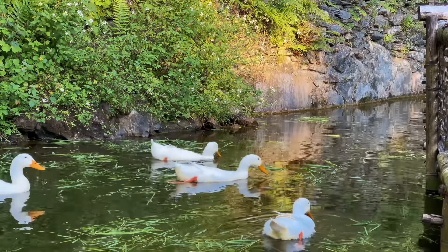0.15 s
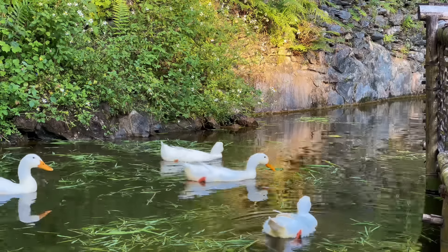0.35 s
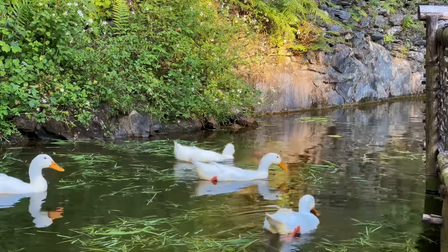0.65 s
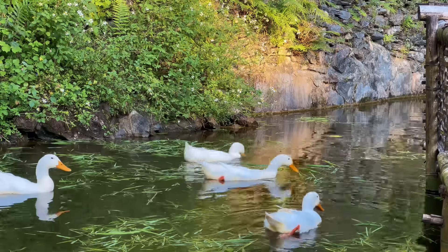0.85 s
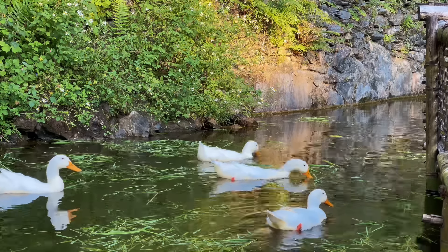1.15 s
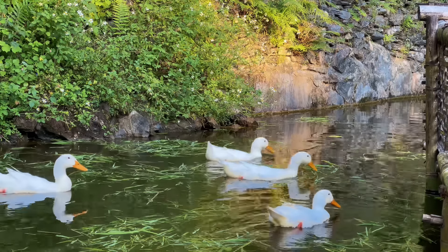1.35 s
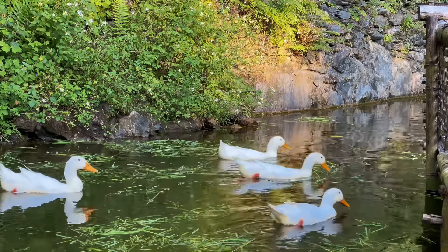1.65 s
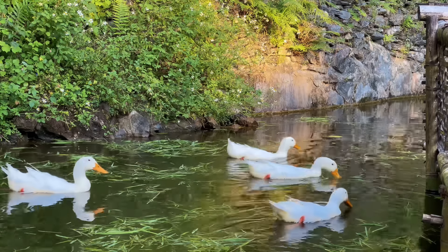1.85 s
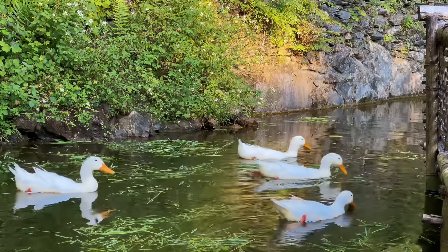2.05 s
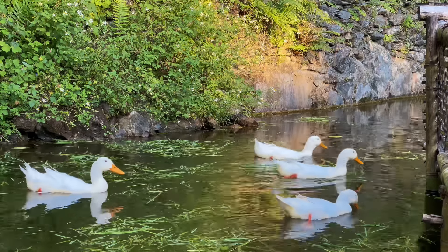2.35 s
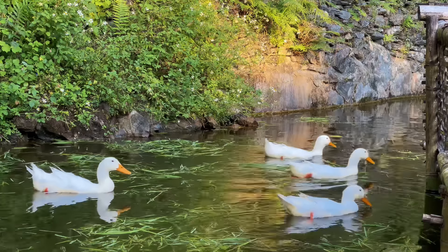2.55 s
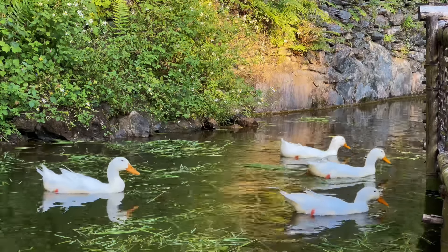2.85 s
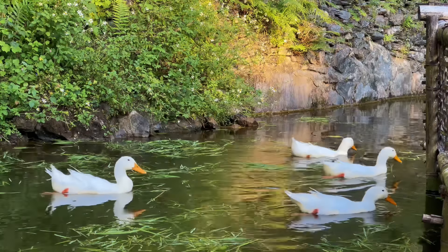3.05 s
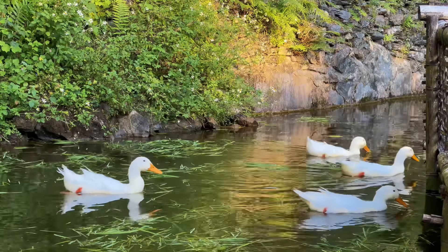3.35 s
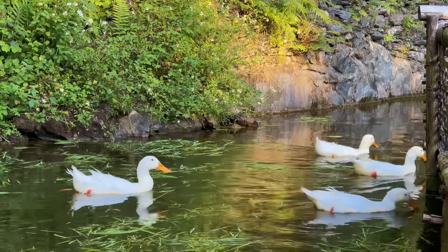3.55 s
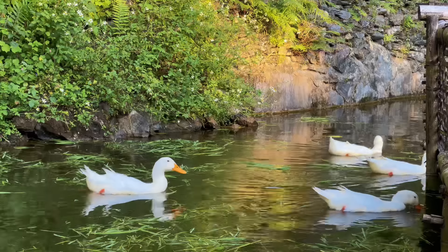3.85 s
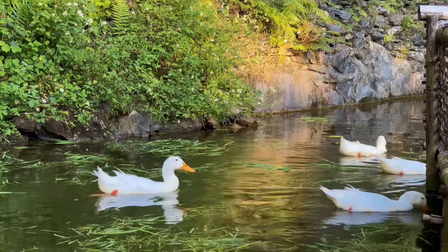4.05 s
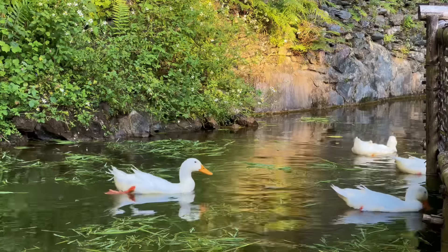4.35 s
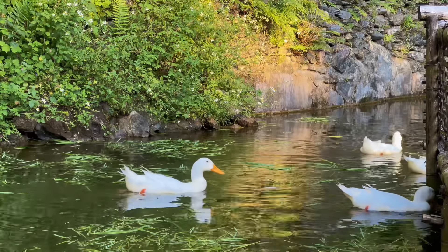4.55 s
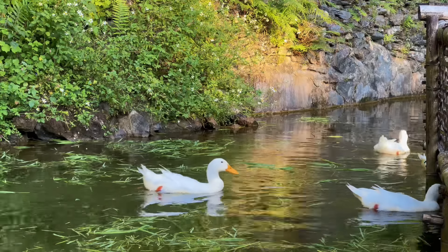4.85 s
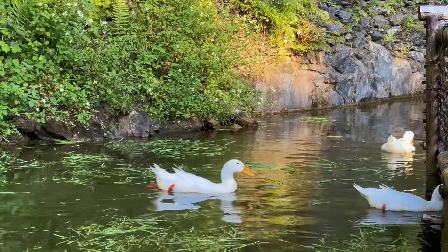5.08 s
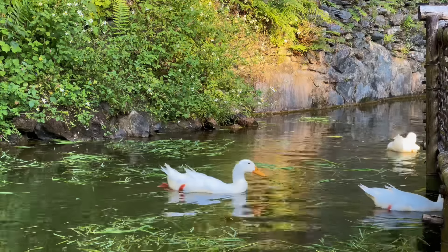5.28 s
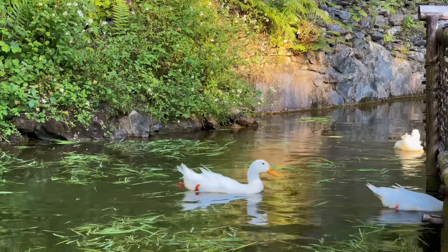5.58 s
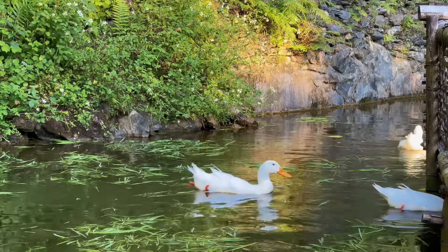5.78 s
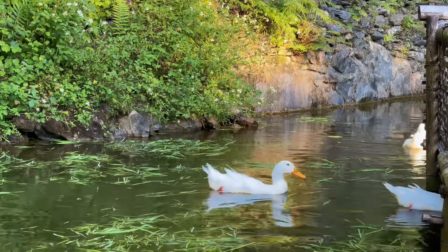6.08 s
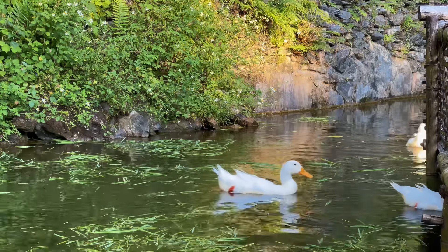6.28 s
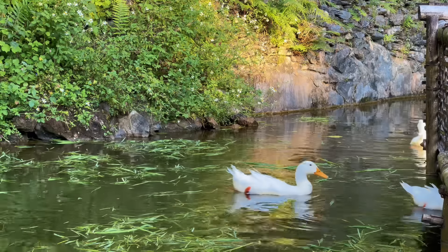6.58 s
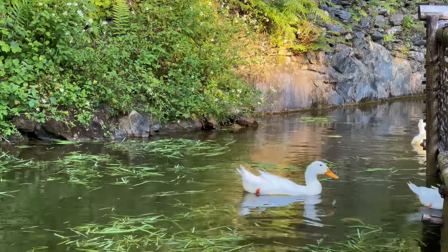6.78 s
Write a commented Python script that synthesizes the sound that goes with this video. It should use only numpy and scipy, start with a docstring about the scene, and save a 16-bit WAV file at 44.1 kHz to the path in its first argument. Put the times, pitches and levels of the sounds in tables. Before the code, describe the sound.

Water trickles steadily into a small pond for about seven seconds, heard in narrow stereo under a soft outdoor hush. In front, ducks paddle and dabble: their feet churn up bubbles and rounded plops, their bills make fine spray and small sloshes, and bright drops patter back with tiny snaps and clicks. The plops carry a slight, quick echo from the banks. Activity is busy from the start to about 1.8 seconds, again from 2.3 to 3.7 and from 4 to 5.3, with a brief lull around 5.5 and more dabbling from 6. A cricket fades in by 0.5 seconds with a high, rapid, even trill and stops suddenly at about 6.7, while fainter crickets continue farther off. Distant engines add a very faint low hum that swells slightly near the start, around 2.5 and between 4 and 5 seconds.

```python
"""A small pond under a rocky, overgrown bank, heard in narrow stereo.
In front, ducks paddle and dabble: their feet and bills trap bubbles that plop, and throw drops
that patter back, while water trickles in steadily. A cricket trills in the bushes, scraping its
wings, with others farther behind. Distant engines hum under a soft outdoor hush."""
import sys
import numpy as np
from scipy import signal
from scipy.fft import rfft, irfft
from scipy.io import wavfile

SR = 44100
rng = np.random.default_rng(int(sys.argv[2]) if len(sys.argv) > 2 else 0)


def inscribe(sig):
    """Save sig as 16-bit PCM at rate SR to the path in sys.argv[1].

    A 1-D sig is mono; a 2-D sig holds one channel per row.
    Samples are clipped to [-1, 1] before scaling.
    """
    pcm = np.round(np.clip(np.atleast_2d(sig).T, -1, 1) * 32767)
    wavfile.write(sys.argv[1], SR, pcm.astype(np.int16))


N = 305245
TIME = np.arange(N) / SR
FREQS = np.maximum(np.arange(N // 2 + 1) * SR / N, 1)
BUBBLE_RISE = 0.12  # share by which a bubble's pitch climbs while it rings

# water lapping between the ducks' pushes, with a lull late on: (time [s], level [dB])
LAPPING_LEVEL = [(0, -63), (.63, -68), (1.1, -67), (1.42, -70), (3.45, -67), (3.7, -69), (4.3, -63.5),
                 (5.35, -66.5), (5.52, -74.5), (6.2, -64), (6.75, -72)]


def paddling(push_s=0.0042, settle_s=0.093):
    """Each push of the feet churns up a swarm of bubbles; a deep kick stirs up bigger ones."""
    # pushes of the feet: (time [s], length [s], shallow churn [dB], deep churn [dB])
    pushes = [(0.0, 0.17, -58, -65.5), (0.212, 0.24, -55.5, -61.5), (1.006, 0.26, -61.5, -80),
              (1.916, 0.063, -60, -87), (2.257, 0.32, -66.5, -81), (2.59, 0.35, -56, -70),
              (2.823, 0.37, -59.5, -60), (3.249, 0.25, -64, -62.5), (3.967, 0.15, -54.5, -67),
              (4.433, 0.16, -63.5, -77), (4.679, 0.037, -53.5, -80), (4.99, 0.082, -62, -75),
              (5.267, 0.068, -62, -90), (5.998, 0.1, -66, -70), (6.444, 0.024, -62, -68.5)]
    # bubbles near the surface: (frequency [Hz], level [dB])
    shallow_spectrum = [(220, -21), (320, -6.5), (440, -3), (600, 1.5), (750, -2), (1050, 0.5),
                        (1250, -13.5), (1500, -0.5)]
    # bubbles from deeper down: (frequency [Hz], level [dB])
    deep_spectrum = [(200, -8), (300, -15), (370, 7.5), (500, -5)]
    shallow_power, deep_power = from_db(in_time(LAPPING_LEVEL)[0]) ** 2, np.zeros(N)
    for s, length, shallow_db, deep_db in pushes:
        push = stirring(s, length, push_s, settle_s)
        shallow_power += (from_db(shallow_db) * push) ** 2
        deep_power += (from_db(deep_db) * push) ** 2
    shallow = bubble_swarm(shallow_spectrum, per_s=380, cycles=37, spread_db=0.5, clump_db=3, count=8000)
    deep = bubble_swarm(deep_spectrum, per_s=260, cycles=12, spread_db=-0.2, clump_db=3, count=4000)
    return np.sqrt(shallow_power) * shallow + np.sqrt(deep_power) * deep


def dabbling(dip_s=0.017, drain_s=0.086, stray_db=-69):
    """Bills dip, sift the floating grass and drain: bouts of fine spray, stray droplets between."""
    # bouts of dabbling: (time [s], length [s], level [dB])
    bouts = [(0.07, 0.16, -55), (0.636, 0.13, -58.5), (1.004, 0.11, -67), (1.244, 0.077, -54.5),
             (2.257, 0.99, -59), (3.55, 0.13, -55), (3.952, 0.18, -59.5), (4.325, 0.53, -56),
             (5.204, .09, -55.5), (5.922, 0.53, -59.5), (6.821, 0.14, -54.5)]
    # fine bubbles at the bill: (frequency [Hz], level [dB])
    spectrum = [(1900, 7.5), (2300, 0), (2850, -0.5), (3300, -15.5), (4300, -1), (5500, -17), (9000, -2)]
    power = sum((from_db(db) * stirring(s, length, dip_s, drain_s)) ** 2 for s, length, db in bouts)
    level = np.sqrt(power + from_db(stray_db) ** 2) * from_db(2.6 * drift(18))
    spray = bubble_swarm(spectrum, per_s=330, cycles=19.5, spread_db=1.5, clump_db=3, count=12000)
    return treble_only(level * spray)


def sloshing(build_s=0.0059, calm_s=0.016):
    """A bill swishes sideways through the water and stirs up a lower slosh of bubbles."""
    # swishes: (time [s], length [s], level [dB])
    swishes = [(1.083, 0.046, -60), (1.268, 0.043, -53.5), (1.497, 0.028, -58), (1.804, 0.038, -54),
               (2.469, 0.023, -54), (4.006, 0.038, -58), (4.272, 0.027, -54), (4.414, 0.17, -59.5),
               (4.685, 0.025, -56)]
    # bubbles in a swish: (frequency [Hz], level [dB])
    spectrum = [(950, -2), (1250, -2.5), (1550, -2.5), (2000, 1)]
    level = sum(from_db(db) * stirring(s, length, build_s, calm_s) for s, length, db in swishes)
    return level * bubble_swarm(spectrum, per_s=350, cycles=22, spread_db=-6, clump_db=-0.5, count=5000)


def plops(gain_db=-0.3, echo_s=0.039, echo_db=-11.5, loss_db=8.5):
    """Feet and bills push big bubbles under; the two banks throw each note back and forth."""
    # large bubbles: (time [s], starting pitch [Hz], level [dB], time to fall 60 dB [s])
    big_bubbles = [(0.018, 836, -31, 0.022), (0.044, 640, -33.5, 0.03), (0.289, 526, -42.5, 0.24),
                   (0.333, 541, -49, 0.29), (0.443, 594, -33.5, 0.029), (0.712, 515, -35, 0.058),
                   (0.747, 505, -46.5, 0.2), (0.812, 500, -50.5, 0.16), (0.888, 500, -48, 0.11),
                   (1.057, 544, -45, 0.22), (1.143, 576, -42, 0.094), (1.237, 569, -44, 0.09),
                   (1.489, 850, -46.5, 0.17), (1.749, 448, -44.5, 0.1), (1.755, 591, -46.5, 0.17),
                   (2.029, 417, -44, 0.056), (2.259, 1020, -46.5, 0.088), (2.411, 697, -41.5, 0.042),
                   (2.608, 1093, -45, 0.089), (2.698, 580, -39, 0.11), (2.896, 486, -35, 0.018),
                   (3.308, 532, -41.5, 0.057), (3.512, 1100, -47.5, 0.097), (3.583, 1135, -44.5, 0.1),
                   (4.019, 950, -32, 0.024), (4.056, 480, -36.5, 0.063), (4.138, 905, -40.5, 0.1),
                   (4.405, 607, -37.5, 0.11), (4.457, 1020, -42, 0.065), (4.885, 1066, -27.5, 0.015),
                   (5.023, 608, -38.5, 0.11), (5.127, 591, -37.5, 0.13), (6.008, 550, -37.5, 0.049),
                   (6.238, 557, -42.5, 0.047), (6.876, 992, -48.5, 0.073)]
    out = np.zeros(N)
    for s, hz, db, t60 in big_bubbles:
        note = from_db(db + gain_db) * bubble(hz, t60, attack_s=0.0024)
        add(out, s, note)
        for bounce in range(3):
            arrival = s + (bounce + 1) * echo_s + rng.normal(0, 0.00223)
            add(out, arrival, from_db(echo_db - bounce * loss_db) * note)
    return out


def gurgles(rise=0.25, wobble_depth=0.13):
    """A pocket of air closes behind a foot: its note swells, wobbles and glides up as it shrinks."""
    # air pockets: (time [s], length [s], starting pitch [Hz], level [dB])
    pockets = [(1.09, 0.035, 1043, -51), (1.312, 0.051, 543, -57), (3.52, 0.039, 790, -56),
               (4.18, 0.05, 603, -55), (4.21, 0.045, 1200, -56), (4.706, 0.029, 742, -52.5),
               (4.811, 0.026, 859, -55), (6.017, 0.02, 730, -46)]
    out = np.zeros(N)
    for s, length, hz, db in pockets:
        age = np.linspace(0, 1, int(length * SR))
        wobble = 1 + wobble_depth * drift(150)[:len(age)]
        add(out, s, from_db(db) * np.sin(np.pi * age) * wobble * tone(hz * (1 + rise * age ** 2)))
    return out


def drops(ring_db=5.5, linger_db=-10.5, droplet_db=-7.5, cycles=24.5, swell_cycles=0.86):
    """A drop splashes and rings, its note lingers faintly, and three droplets land just after it."""
    # drops flung back onto the pond: (time [s], pitch [Hz], level [dB])
    landings = [(0.1398, 2910, -34), (0.3282, 4330, -37), (0.3815, 2310, -34.5), (0.9055, 2820, -32.5),
                (1.0087, 2240, -39), (1.0266, 1830, -42), (1.0415, 3360, -38.5), (1.2186, 2610, -47),
                (1.2715, 2830, -40), (1.2954, 1800, -44), (1.5292, 2170, -41.5), (1.605, 2280, -38.5),
                (1.8817, 2020, -47), (1.956, 2190, -43), (1.9795, 2070, -39.5), (2.101, 2350, -39),
                (2.111, 1450, -43.5), (2.2433, 4180, -38), (2.2836, 2430, -38), (2.3383, 2350, -40.5),
                (2.7015, 2460, -43), (2.9989, 2900, -35.5), (3.034, 4160, -39), (3.0988, 2686, -35),
                (3.111, 2670, -37), (3.3494, 2400, -38), (3.378, 2650, -40.5), (3.5975, 4050, -32.5),
                (3.5977, 2240, -35.5), (3.6682, 3560, -34.5), (4.0505, 2750, -39.5), (4.5615, 4040, -37),
                (4.7658, 3460, -38.5), (4.798, 2550, -44), (5.0648, 2300, -33.5), (5.1135, 2680, -36.5),
                (5.208, 2700, -38.5), (5.244, 4100, -36), (5.5418, 2630, -43.5), (5.9495, 4340, -36.5),
                (6.0152, 4130, -36), (6.2614, 2600, -55), (6.286, 3890, -39), (6.441, 4090, -38.5),
                (6.4901, 4270, -39), (6.8349, 3600, -42)]
    out = np.zeros(N)
    for s, hz, db in landings:
        add(out, s, from_db(db + ring_db) * bubble(hz, cycles / hz, swell_cycles / hz))
        add(out, s, from_db(db + linger_db) * bubble(hz, t60=0.04, attack_s=0.0028, rise=0.18))
        for wait, detune in zip(rng.exponential(1, size=3), rng.standard_normal(size=3)):
            droplet_hz = min(hz * np.exp(0.2 * detune), SR / 4)
            droplet = bubble(droplet_hz, cycles / droplet_hz, swell_cycles / droplet_hz, rise=0)
            gain = from_db(db + ring_db + droplet_db - 5.2 * wait)  # later ones are fainter
            add(out, s + 0.00107 + 0.0042 * wait, gain * droplet)
    return out + splashes(landings, gain_db=-4, decay_s=0.0046, band_hz=(1720, 4700))


def bursting_bubbles(snap_db=11, cycles=33):
    """A tiny bubble bursts at the surface with one sharp snap and a brief spit of spray."""
    # bursts: (time [s], pitch [Hz], level [dB])
    bursts = [(0.7056, 7500, -34), (1.2712, 7760, -40), (1.5285, 9400, -25.5), (3.214, 9670, -30),
              (3.9646, 11000, -36), (4.2793, 7340, -35), (4.584, 9100, -38), (4.8048, 8900, -37),
              (5.181, 8780, -38.5), (5.2446, 8500, -37.5), (6.262, 8900, -37.5), (6.626, 10610, -36.5)]
    out = np.zeros(N)
    for s, hz, db in bursts:
        add(out, s, from_db(db + snap_db) * bubble(hz, cycles / hz, attack_s=1 / hz, rise=0))
    return out + splashes(bursts, gain_db=-5, decay_s=0.0054, band_hz=(5480, 11800))


def droplet_clicks(gain_db=-52, per_s=16, decay_s=0.00047, count=800):
    """Fine droplets hit grass and water with a dry click and trap no bubble."""
    out, t = np.zeros(N), np.arange(SR // 200) / SR
    when, chance, faintness = rng.random((count, 3)).T
    clicks = rng.standard_normal((count, len(t))) * np.exp(-t / decay_s)
    for k in np.flatnonzero(chance < per_s * N / SR / count):
        add(out, when[k] * N / SR, from_db(gain_db - np.log(faintness[k] + 0.065)) * clicks[k])
    return butterworth(out, 2, (1900, 9900), "band")


def ripples(gain_db=-2.5, uneven_db=5):
    """Small waves wash through the floating grass and against the bank, following the lapping."""
    # wash of the waves: (frequency [Hz], level [dB])
    spectrum = [(350, -17.5), (950, 4), (1230, 0.5), (1650, -4.5), (2100, -14.5)]
    return from_db(in_time(LAPPING_LEVEL)[0] + gain_db + uneven_db * drift(12)) * noise(spectrum)


def trickle(gain_db=-52.5):
    """Water runs steadily into the pond as a dense swarm of tiny bubbles."""
    # bubbles at the inflow: (frequency [Hz], level [dB])
    spectrum = [(1950, 1), (2500, 1.5), (4200, -2), (5500, -7), (7500, -4), (9000, -0.5), (11000, 0.5),
                (12800, -75)]
    swarm = bubble_swarm(spectrum, per_s=1500, cycles=51, spread_db=5.5, clump_db=3.5, count=24000)
    return treble_only(from_db(gain_db) * swarm)


def near_cricket(mid_stroke_s=0.7014):
    """The nearest cricket in the bushes warms up, trills a little unevenly and stops at once."""
    # wing tempo: (time [s], rate [strokes/s])
    tempo = [(1.4, 22.76), (1.6, 22.63), (4.1, 22.63), (4.3, 22.77)]
    # course of the song: (time [s], pitch [Hz], level [dB])
    trill = [(.2, 6420, -68), (.48, 6570, -44.5), (.65, 6570, -46), (.7, 6680, -41.5), (3, 6720, -40.5),
             (6.655, 6690, -40.5), (6.68, 6770, -100)]
    strokes = np.cumsum(in_time(tempo)[0]) / SR
    strokes = strokes - np.interp(mid_stroke_s, TIME, strokes) + 0.5
    hz, db = in_time(trill)
    return from_db(db) * wing_song(strokes, hz, waver_hz=12.5, uneven_db=1.15)


def far_crickets():
    """Crickets farther off keep up their own tempos."""
    # one row a cricket: (pitch [Hz], rate [strokes/s], level [dB])
    singers = [(7140, 22.9, -61.5), (7320, 18, -54)]
    out = np.zeros(N)
    for hz, rate, db in singers:
        strokes = rate * TIME + rng.random() + 0.066 * drift(1.8)
        out += from_db(db) * wing_song(strokes, hz, waver_hz=60.8, uneven_db=5.5)
    return out


def wing_song(strokes, hz, waver_hz, uneven_db):
    """Each closing of a cricket's wings draws the scraper over the file: one arched pip."""
    # the scraper speeds up and slows: (place in the cycle [0-1], level [dB], pitch drop [Hz])
    stroke_shape = [(0, -62, 159.5), (.25, -28, 159), (.34, -4.5, 100), (.46, -3.5, -0.5),
                    (0.551, -3, 95.5), (.6, -17, 239.5), (.64, -9, 319.5), (.71, -49, 319.5)]
    place, db, drop_hz = np.transpose(stroke_shape)
    cycle = strokes % 1
    pitch = hz - np.interp(cycle, place, drop_hz) + waver_hz * drift(200)
    return from_db(np.interp(cycle, place, db) + uneven_db * drift(25)) * tone(pitch)


def far_engines(hum_db=-1.5, rumble_db=-1):
    """Of two distant engines, only the firing notes and a dull rumble carry to the pond."""
    # first engine's firing note: (time [s], pitch [Hz])
    firing_note = [(0, 74.9), (1.5, 71.8), (2.5, 74.95), (2.75, 76)]
    # its loudness: (time [s], level [dB])
    loudness = [(0.0, -78), (0.27, -63), (1.48, -78), (1.75, -64), (2.1, -78), (2.47, -58.5), (2.85, -58.5),
                (3.6, -70.5), (4.01, -58.5), (4.12, -71), (5.11, -67), (5.15, -101), (5.72, -75.5),
                (6.92, -78)]
    # its rumble: (frequency [Hz], level [dB])
    rumble_spectrum = [(20, -27), (48, 6), (80, 11.5), (130, 0.5), (300, -9.5)]
    # the second engine swells and eases off: (time [s], pitch [Hz], level [dB])
    rev_curve = [(4.0, 79.7, -110), (4.1, 82.3, -85), (4.6, 107.6, -71.5), (4.78, 102, -72),
                 (4.95, 93.6, -100)]
    hum = from_db(hum_db) * np.sqrt(2) * tone(in_time(firing_note)[0] + 0.15 * drift(9.2))
    rumble = from_db(rumble_db) * noise(rumble_spectrum)
    rev_hz, rev_db = in_time(rev_curve)
    revving = from_db(rev_db) * np.sqrt(2) * tone(rev_hz)
    return from_db(in_time(loudness)[0]) * (hum + rumble) + revving


def bank_echo(x, echo_s, echo_db, scatter_db, t60=0.063):
    """The rock face returns one echo; stones and bushes scatter a short tail."""
    t = np.arange(SR // 2) / SR
    tail = rng.standard_normal(len(t)) * np.exp(-np.log(1000) * t / t60) * (t > 0.006)
    response = from_db(scatter_db) * tail / np.linalg.norm(tail)
    response[int(echo_s * SR)] += from_db(echo_db)
    return signal.fftconvolve(x, response)[:N]


def hush(level_db):
    """Soft, steady outdoor noise all around the microphone."""
    # open air: (frequency [Hz], level [dB])
    spectrum = [(20, -34), (50, -8), (110, -2.5), (200, -3.5), (850, -4.5), (1200, -7.5), (1750, 2),
                (2200, 1.5), (4300, -2.5), (5600, -5.5), (7300, 8.5), (8000, -3.5), (10800, 3),
                (13000, -9.5)]
    return from_db(level_db) * noise(spectrum)


def bubble(hz, t60, attack_s, rise=BUBBLE_RISE):
    """A trapped bubble swells, rings out, and climbs in pitch as it nears the surface."""
    t = np.arange(int(t60 * SR) + 2) / SR
    envelope = (1 - np.exp(-(t / attack_s) ** 2)) * np.exp(-np.log(1000) * t / t60)
    return envelope * np.sin(2 * np.pi * hz * (1 + rise * t / t60 / 2) * t)


def bubble_swarm(spectrum, per_s, cycles, spread_db, clump_db, count):
    """Out of count possible bubbles, some sound in clumps, each ringing for some cycles; rms 1."""
    out = np.zeros(N)
    when, chance, pitch, strength, life = rng.random((count, 5)).T
    onsets = when * N / SR
    clumps = np.interp(onsets, TIME, from_db(clump_db * drift(50)))
    low_hz, high_hz = spectrum[0][0], spectrum[-1][0]
    hz = low_hz * (high_hz / low_hz) ** pitch
    gain = gain_at(spectrum, hz) * hz * from_db(-spread_db * np.log(strength + 0.13))
    t60 = cycles * (0.5 + life) / hz
    for k in np.flatnonzero(chance < clumps * per_s * N / SR / count):
        add(out, onsets[k], gain[k] * bubble(hz[k], t60[k], attack_s=1 / hz[k]))
    return rms_one(out)


def splashes(events, gain_db, decay_s, band_hz):
    """A short splash of noise each time the surface breaks."""
    out, t = np.zeros(N), np.arange(SR // 50) / SR
    for s, _, db in events:
        add(out, s, from_db(db + gain_db) * rng.standard_normal(len(t)) * np.exp(-t / decay_s))
    return butterworth(out, 4, band_hz, "band")


def stirring(s, length, attack_s, release_s):
    """A movement in the water builds up, holds for its length and dies away."""
    return np.clip((TIME - s) / attack_s, 0, 1) * np.exp(-np.maximum(TIME - s - length, 0) / release_s)


def treble_only(x, low_hz=1730):
    """The smallest bubbles make no low sound."""
    return butterworth(x, 6, low_hz, "high")


def butterworth(x, order, hz, kind):
    """Low-, high- or band-pass filter."""
    return signal.sosfilt(signal.butter(order, hz, kind, fs=SR, output="sos"), x)


def from_db(db):
    """Decibels to gain."""
    return 10 ** (np.asarray(db) / 20)


def rms_one(x):
    """Scale to rms 1."""
    return x / np.sqrt(np.mean(x ** 2) + 1e-20)


def in_time(rows):
    """Each column of a curve, sample by sample."""
    s, *columns = np.transpose(rows)
    return [np.interp(TIME, s, column) for column in columns]


def gain_at(spectrum, hz):
    """Read a spectrum on a log-frequency axis."""
    points, db = np.transpose(spectrum)
    return from_db(np.interp(np.log(hz), np.log(points), db))


def drift(per_s):
    """Smooth random wander, rms 1."""
    knots = rng.standard_normal(2048)
    return rms_one(np.interp(TIME * per_s, np.arange(len(knots)), knots))


def tone(hz):
    """A sine that follows a pitch curve."""
    return np.sin(2 * np.pi * np.cumsum(hz) / SR)


def noise(spectrum):
    """Noise of a given colour, rms 1."""
    return rms_one(irfft(rfft(rng.standard_normal(N)) * gain_at(spectrum, FREQS), N))


def add(out, s, sound):
    """Mix a sound in at time s."""
    start = max(int(s * SR), 0)
    out[start:start + len(sound)] += sound[:max(N - start, 0)]


def scene():
    """Water in front of the microphone, crickets on the bank, engines far off; left and right."""
    water = trickle() + paddling() + dabbling() + sloshing() + ripples()
    water += plops() + gurgles() + drops() + bursting_bubbles() + droplet_clicks()
    near = water + near_cricket()
    mid = near + hush(-54.5) + bank_echo(near, echo_s=0.025, echo_db=-23.5, scatter_db=-10)
    mid += far_crickets() + far_engines()
    # a faint stereo spread of water and hush, kept to the lows and lower middle
    diffuse = bank_echo(water, echo_s=0.02, echo_db=-29, scatter_db=-26.5) + hush(-67)
    side = butterworth(diffuse, 4, (110, 1500), "band")
    return np.array([mid + side, mid - side])


def record(dry):
    """The channels differ in phase, the microphone dulls the highest treble, and the top is cut."""
    # the right channel leads the left in the lower middle and top treble, centred between:
    # (frequency [Hz], phase [rad])
    right_lead = [(150, 0.19), (500, 0.66), (1400, 1.34), (2100, 0), (8800, 0.011), (9100, 1.42),
                  (10270, np.pi), (11800, 2 * np.pi)]
    lead = np.interp(FREQS, *np.transpose(right_lead))
    left_only = np.array([[1], [0]])
    channels = irfft(rfft(dry) * np.exp(-1j * lead * left_only), N)
    dulled = butterworth(channels, 8, 12400, "low")
    cutoff_hz = 16473
    return signal.sosfilt(signal.cheby2(12, 70, cutoff_hz, fs=SR, output="sos"), dulled)


dry = scene()
out = record(dry)
inscribe(out)
```